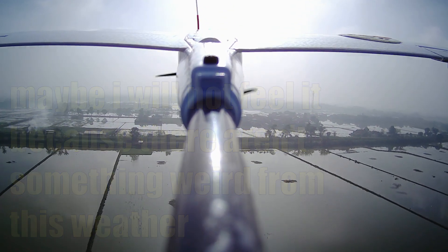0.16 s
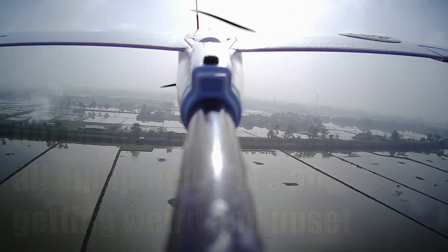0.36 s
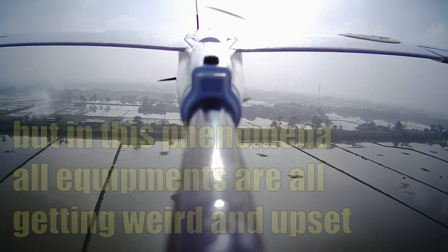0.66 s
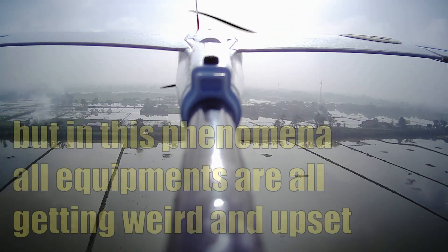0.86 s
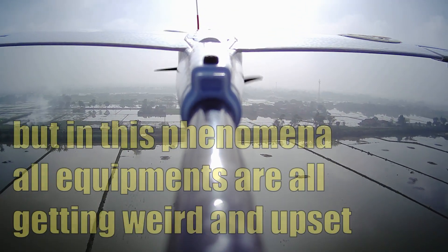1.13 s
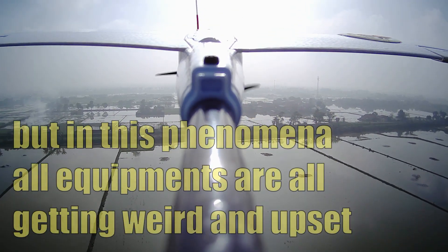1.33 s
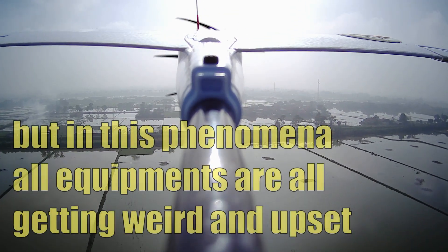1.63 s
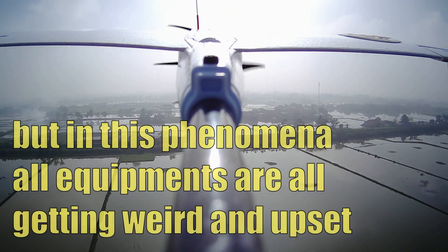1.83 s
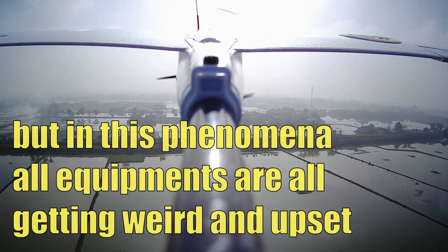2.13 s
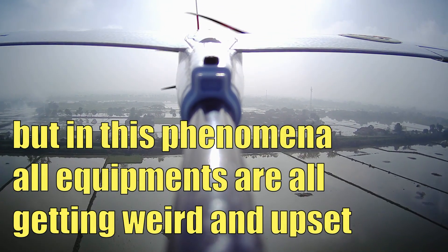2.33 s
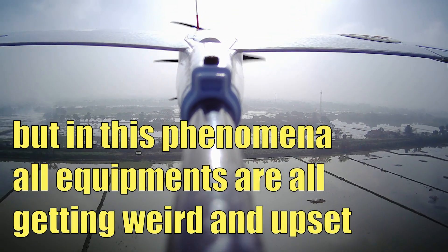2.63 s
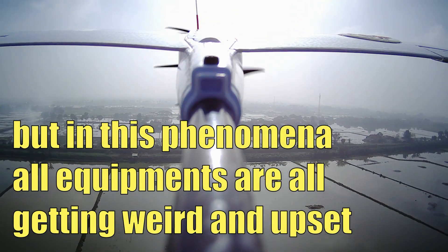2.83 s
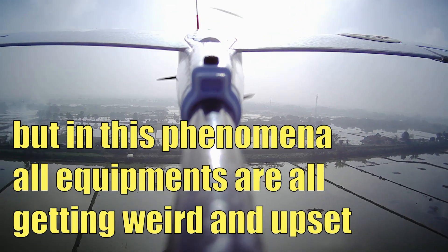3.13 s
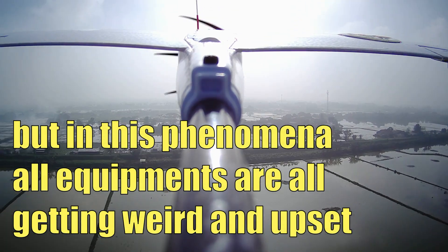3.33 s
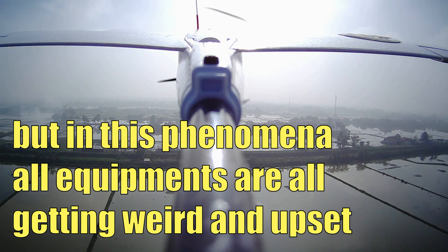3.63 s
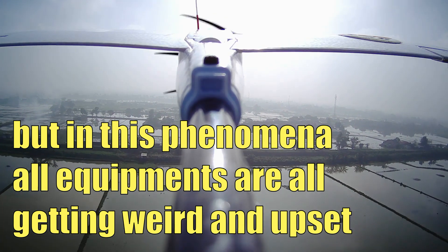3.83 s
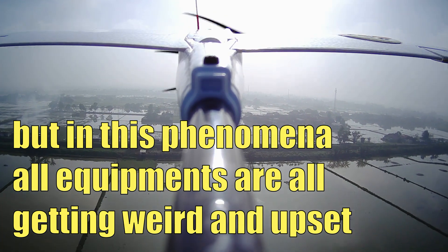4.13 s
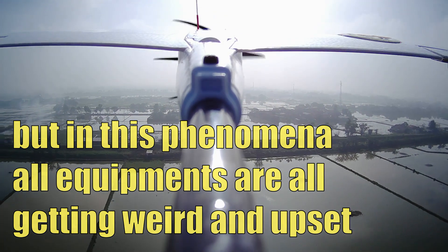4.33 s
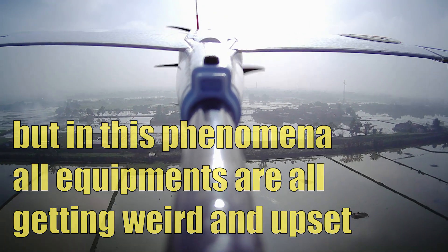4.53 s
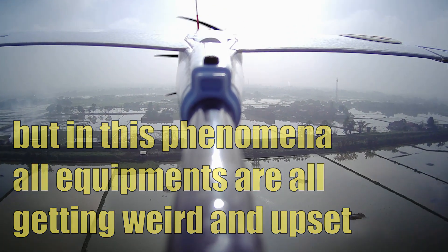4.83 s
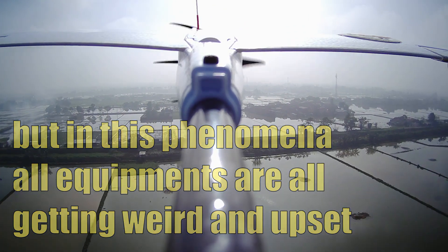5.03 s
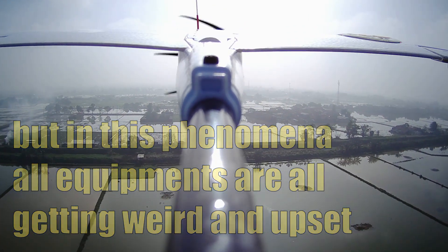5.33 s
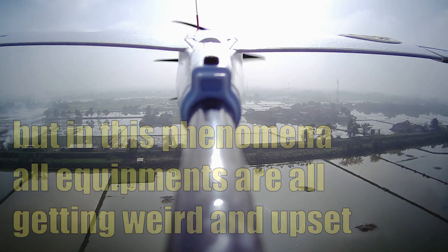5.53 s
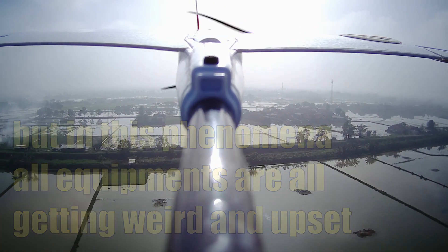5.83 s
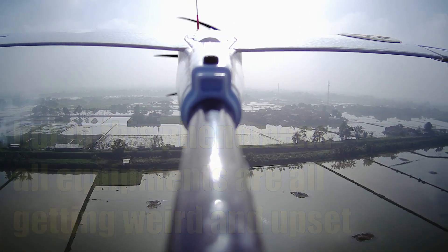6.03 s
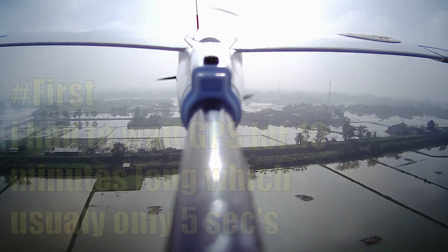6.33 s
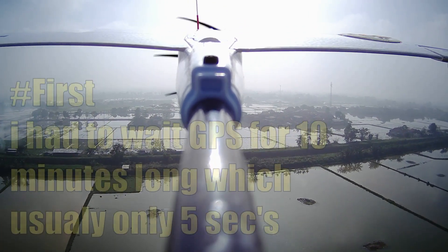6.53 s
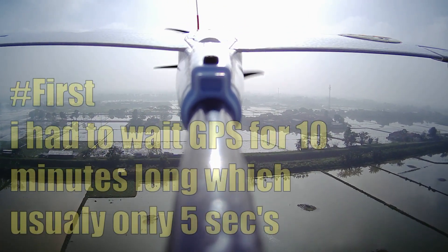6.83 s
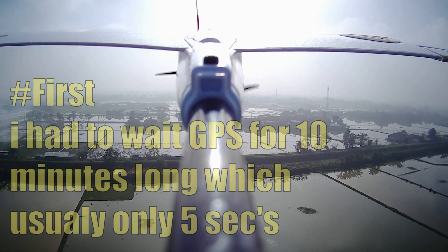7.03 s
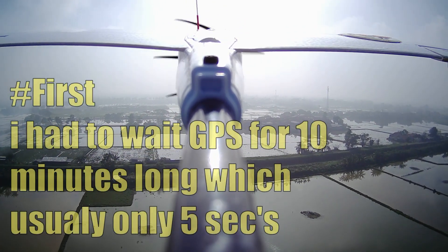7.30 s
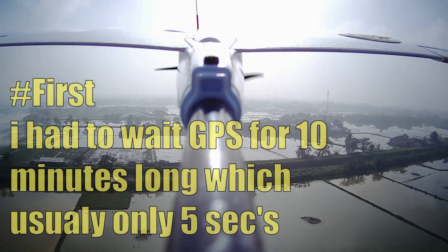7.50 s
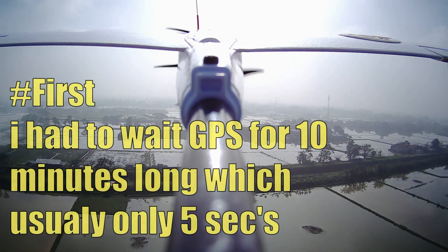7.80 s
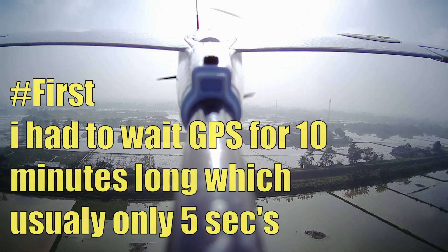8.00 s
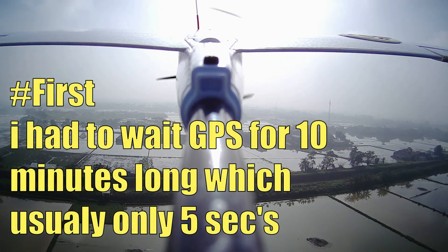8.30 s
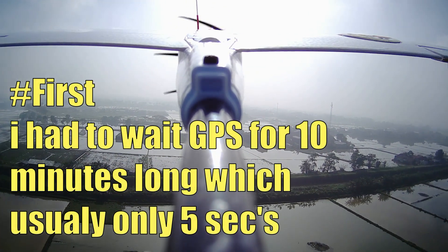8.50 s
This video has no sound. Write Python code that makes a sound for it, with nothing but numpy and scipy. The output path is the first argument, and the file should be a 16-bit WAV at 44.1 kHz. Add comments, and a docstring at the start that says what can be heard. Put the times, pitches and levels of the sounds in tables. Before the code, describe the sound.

Level flight in open air, heard from a microphone fixed to the aircraft. Air rushes steadily over the case with soft low puffs and a finer crackling texture. The electric motor hums and whines faintly, rising slightly, easing back, then climbing again near the end. Short gusts add sizzle. Camera hiss and a tiny buzzing high whistle stay constant, with a small tick near the start and two later.

```python
"""Riding on a model aeroplane

A small camera rides on the tail boom of an electric model aeroplane in level flight.
Wind is shaped noise: low buffeting, a finer rush and a bright sizzle, stirred by eddies and gusts.
The motor is a set of wavering sine tones that follow the throttle up and down.
Under it lie the camera's hiss, a thin high whistle that pauses once a picture frame, and three tiny ticks."""
import sys
import numpy as np
from scipy import signal
from scipy.fft import rfft, irfft
from scipy.io import wavfile
from scipy.ndimage import uniform_filter1d

SR = 44100
rng = np.random.default_rng(int(sys.argv[2]) if len(sys.argv) > 2 else 0)


def waveform_to_disk(signal):
    """Save audio, clipped to [-1, 1], as 16-bit WAV at the path in sys.argv[1]."""
    frames = np.transpose(np.atleast_2d(signal))
    scaled = np.clip(frames, -1, 1) * 32767
    samples = np.round(scaled).astype(np.int16)
    wavfile.write(sys.argv[1], SR, samples)


N = 381906
T = np.arange(N) / SR  # the time of every sample, in seconds

# Colour of the buffeting: (frequency [Hz], relative level [dB])
BUFFET_COLOUR = [(20, -39), (40, -32), (65, -18), (100, -12), (160, -6), (290, -0.5), (420, 0.5),
                 (540, -2.5), (750, -9), (1000, -17), (1500, -32), (3000, -57)]
# Colour of the rush: (frequency [Hz], relative level [dB])
RUSH_COLOUR = [(300, -13.5), (700, -2), (1100, 0), (1500, -1), (1750, -0.5), (2050, 0), (2300, -6),
               (2550, -11.5), (2950, -21.5), (3600, -29), (6000, -45.5)]
# Colour of the sizzle at the top of a gust: (frequency [Hz], relative level [dB])
SIZZLE_COLOUR = [(1000, -21), (2400, 0.5), (3100, -4), (4200, -18), (8000, -42)]
# Slow drift of the buffeting, before gusts and wander: (time [s], level [dB])
BUFFET_DRIFT = [(0, -41), (.8, -41), (2.2, -39.2), (3.6, -40.5), (5.2, -41), (6.8, -40), (7.8, -40.5),
                (8.66, -40)]
# Gusts that brighten the air: (time of peak [s], half length [s], lift of the rush [dB])
GUST_SWELLS = [(.92, .2, 1.5), (1.78, .15, 0.7), (2.69, 0.088, 2.5), (4.5, 0.12, 4), (5.62, 0.24, 0.8),
               (6.62, .12, 1.1), (8.15, 0.2, 0.6)]
# Single puffs on the case: (time of peak [s], half length [s], lift of the buffeting [dB])
PUFF_SWELLS = [(0.563, 0.016, 6), (1.03, .04, 1.5), (2.22, 0.05, 1.5), (4.1, 0.055, 0.5), (6.002, 0.008, 6),
               (6.68, .04, 1.5), (6.953, 0.011, 5)]
# The rush at the starting throttle [dB], and its rise with the propeller's wash [dB per Hz of shaft speed]
RUSH_DB, WASH_DB_PER_HZ = -51.5, 0.19

# Throttle settings, each reached by a short ramp: (time at mid-ramp [s], shaft speed [turns per second])
THROTTLE_STEPS = [(1.42, 149.3), (3.35, 146.9), (6.4, 149.3), (7.2, 151.5)]
START_SHAFT_HZ, THROTTLE_RAMP_S = 146.8, 0.31
# Pitch of each motor tone: (multiple of the shaft rate [no unit])
TONE_ORDERS = [1, 10.63, 10.73, 11, 13, 18.56]
# Strength and unsteadiness of each motor tone: (level [dB], flutter [dB], pitch wander [Hz])
TONE_SETTINGS = [(-55.5, 2.3, 0.4), (-67, 2, 2.01), (-67, 1.6, 2.02), (-60, 0.65, 0.754), (-67, 2.7, 1.04),
                 (-82, 2, 9.9)]

# Colour of the camera's hiss: (frequency [Hz], relative level [dB])
HISS_COLOUR = [(100, -5), (3000, 2), (5000, 0.5), (8200, -1), (12000, -0.8), (13200, 5), (14300, 1.5),
               (15700, -7.5)]
# Rings added to the hiss: (frequency [Hz], width [Hz], peak against the hiss around it [dB])
HISS_RESONANCES = [(6133, 280, 14), (7130, 70, 9), (9670, 840, 7), (10870, 390, 10.5), (11950, 220, -2)]
# Tiny dry ticks: (time [s], step height [dB], softness [s])
TICK_STEPS = [(0.113, -28, 0.000079), (5.128, -33.5, .00001), (7.435, -38, .00012)]
FRAME_HZ, WHISTLE_HZ, FRAME_PAUSE_S = 59.94, 13374, 0.0006
TOP_HZ = 15700  # the camera's upper limit


def undb(db):
    """Turn decibels into a gain."""
    return 10 ** (np.asarray(db) / 20)


def unit(x):
    """Scale a sound to an average (rms) strength of 1."""
    return x / np.sqrt(np.mean(x ** 2))


def walk(rate):
    """Smooth random wander that changes about rate times a second, with rms 1."""
    hold = max(int(SR / rate), 2)
    held = np.repeat(rng.standard_normal(N // hold + 2), hold)
    smooth = uniform_filter1d(uniform_filter1d(held, hold), hold)
    return unit(smooth[:N])


def colour(x, points, rings=()):
    """Shape a sound by a smooth spectrum with resonances on top; rms 1."""
    f = np.arange(N // 2 + 1) * SR / N + 1e-9  # just above zero, so its logarithm exists
    hz, db = np.transpose(points)
    gain = undb(np.interp(np.log(f), np.log(hz), db))
    power = 1
    for centre, width, ring_db in rings:
        detuning = (f * f - centre ** 2) / (f * width)
        power = power + undb(ring_db) ** 2 / (1 + detuning ** 2)
    return unit(irfft(rfft(x) * gain * np.sqrt(power), N))


def wind(shaft_hz, buffet_eddy_db=1.5, rush_eddy_db=1.0, grain_db=1.86, flutter_db=0.24,
         sizzle_db=-75, sizzle_growth=2.9):
    """Turbulent air on the case: each passing eddy lifts the low buffeting and the finer rush together."""
    buffet_db, rush_db = airflow(shaft_hz)
    coarse, fine, finest = rng.standard_normal((3, N))
    eddies = walk(400)
    flutter = flutter_db * walk(35)
    buffet_lift = undb(buffet_eddy_db * eddies + flutter + swells(PUFF_SWELLS))
    buffet = colour(coarse * buffet_lift, BUFFET_COLOUR)
    # the smallest eddies break up in bursts under a millisecond long, a fine crackle
    bursts = undb(rush_eddy_db * eddies + grain_db * walk(1400) + flutter)
    rush = colour(fine * bursts, RUSH_COLOUR)
    # the top edge grows much faster than the rush, so a gust sounds brighter
    sizzle_level = sizzle_db + sizzle_growth * (rush_db - rush_db.mean())
    sizzle = colour(finest * bursts ** 2, SIZZLE_COLOUR) * undb(sizzle_level)
    return buffet * undb(buffet_db) + rush * undb(rush_db) + sizzle


def airflow(shaft_hz, buffet_wander_db=0.6, rush_wander_db=0.18, wander_rate=5, thinning=0.17):
    """Levels in dB: the rush follows throttle and gusts; a strong gust thins the buffeting."""
    gust_db = swells(GUST_SWELLS)
    drift_db = np.interp(T, *np.transpose(BUFFET_DRIFT))
    # thinning grows with the square of the gust's lift
    buffet_db = drift_db - thinning * gust_db ** 2 + buffet_wander_db * walk(wander_rate)
    wash_db = WASH_DB_PER_HZ * (shaft_hz - START_SHAFT_HZ)
    rush_db = RUSH_DB + wash_db + gust_db + rush_wander_db * walk(wander_rate)
    return buffet_db, rush_db


def swells(rows):
    """Each gust or puff rises and falls as a bell curve, in dB."""
    return sum(db * np.exp(-((T - at) / length) ** 2) for at, length, db in rows)


def motor(shaft_hz):
    """The shaft's unbalance hums at the turning rate; magnetic orders and bearings whine far above it."""
    out = 0
    for order, (db, flutter_db, wander_hz) in zip(TONE_ORDERS, TONE_SETTINGS):
        tone_hz = order * shaft_hz + wander_hz * walk(14)
        phase = 2 * np.pi * np.cumsum(tone_hz) / SR
        tone = np.sin(phase) * undb(flutter_db * walk(12))
        out = out + undb(db) * unit(tone)
    return out


def shaft_speed():
    """The motor holds its speed and ramps to each new throttle setting; turns per second."""
    hz = np.full(N, START_SHAFT_HZ)
    for at, new_hz in THROTTLE_STEPS:
        progress = np.clip((T - at) / THROTTLE_RAMP_S + 0.5, 0, 1)
        hz = hz + (new_hz - hz) * progress
    return hz


def ticks(decay_s=0.00024):
    """Each tick swells briefly, flips sign in a step and dies away; a softer step sounds duller."""
    out = 0
    for at, db, softness in TICK_STEPS:
        step = 0.5 * np.tanh((T - at) / softness)  # one unit from bottom to top
        out = out + undb(db) * step * np.exp(-np.abs(T - at) / decay_s)
    return out


def electronics(hiss_db=-66.5, whistle_db=-71.5):
    """Ringing amplifier hiss, and a whistle that starts afresh with each picture frame after a short pause."""
    hiss = colour(rng.standard_normal(N), HISS_COLOUR, HISS_RESONANCES)
    in_frame = T % (1 / FRAME_HZ)  # seconds since the frame began
    whistle = np.sin(2 * np.pi * WHISTLE_HZ * in_frame) * (in_frame > FRAME_PAUSE_S)
    return undb(hiss_db) * hiss + undb(whistle_db) * unit(whistle)


def scene():
    """Everything adds up at the one microphone."""
    shaft_hz = shaft_speed()
    mix = wind(shaft_hz) + motor(shaft_hz) + ticks() + electronics()
    return mix[None]  # one channel


def record(dry):
    """The camera cuts the top steeply, with a low-pass filter."""
    top_cut = signal.ellip(12, 0.1, 70, TOP_HZ, fs=SR, output="sos")  # order, ripple dB, depth dB
    return signal.sosfilt(top_cut, dry)


dry = scene()
out = record(dry)
waveform_to_disk(out)
```